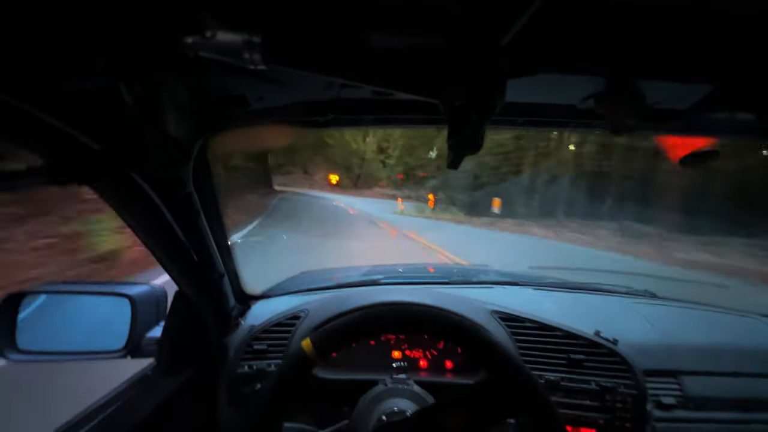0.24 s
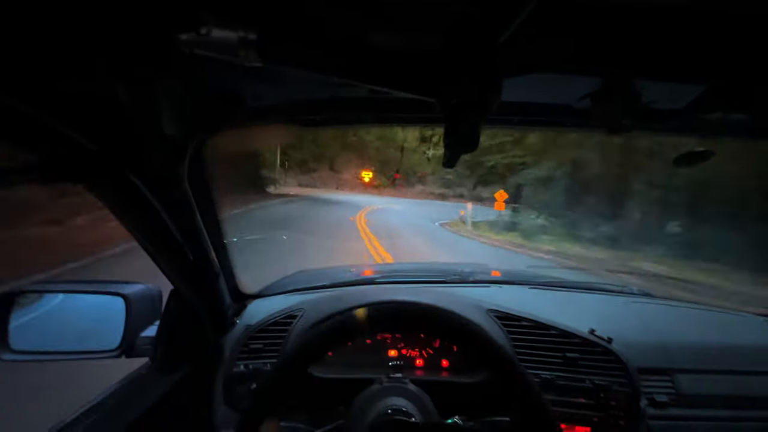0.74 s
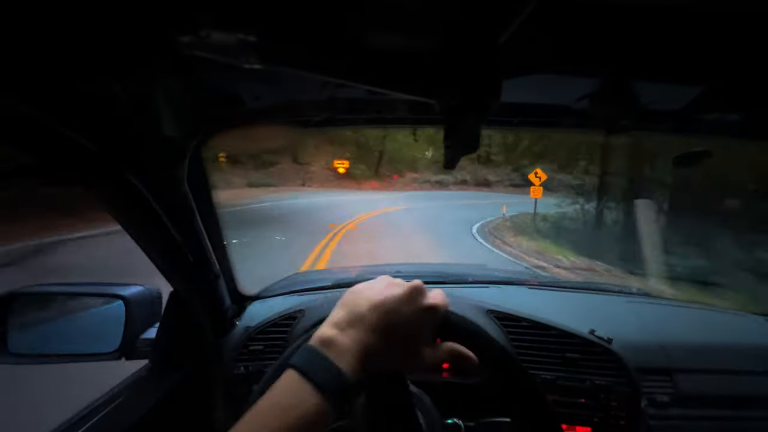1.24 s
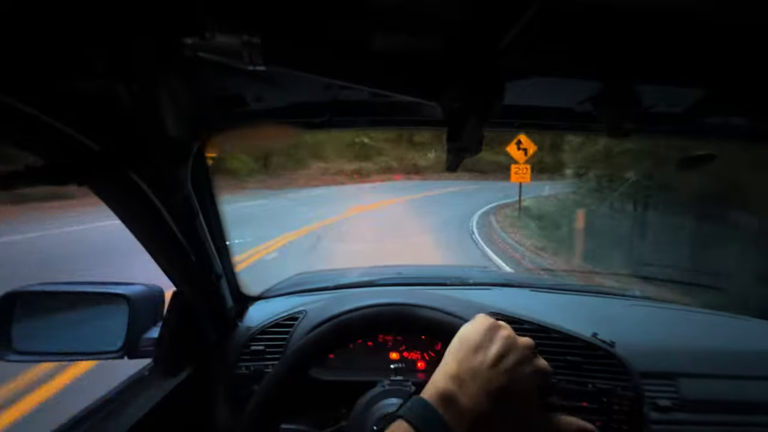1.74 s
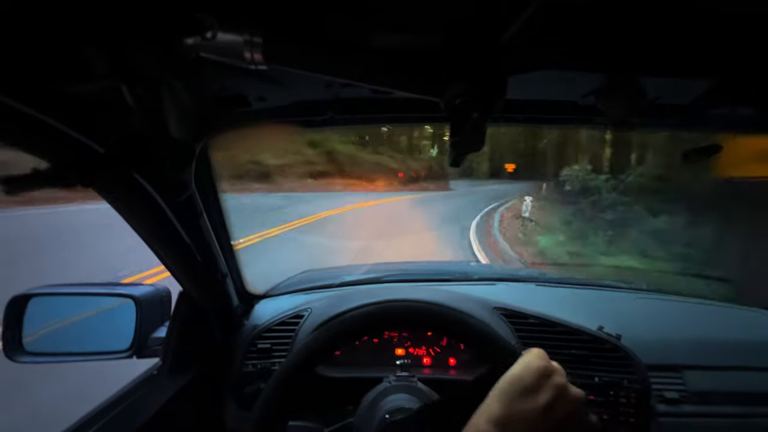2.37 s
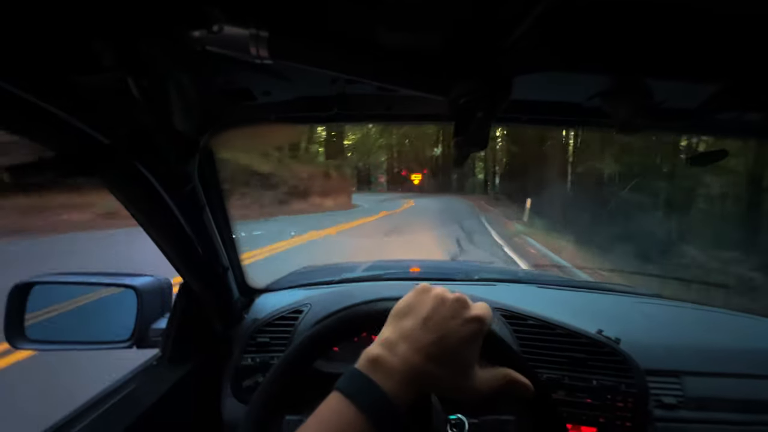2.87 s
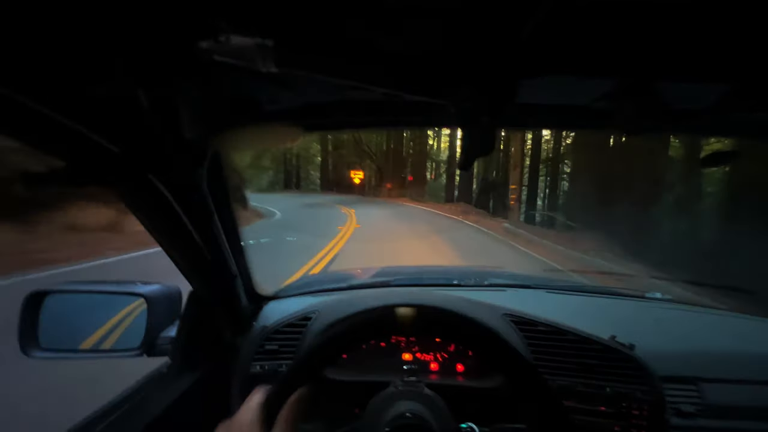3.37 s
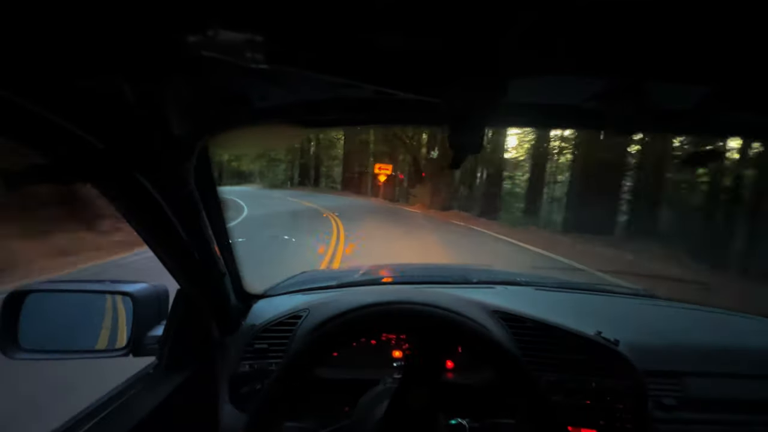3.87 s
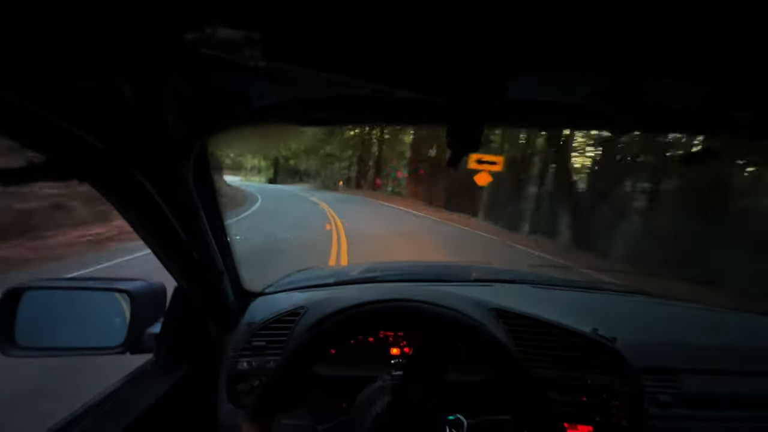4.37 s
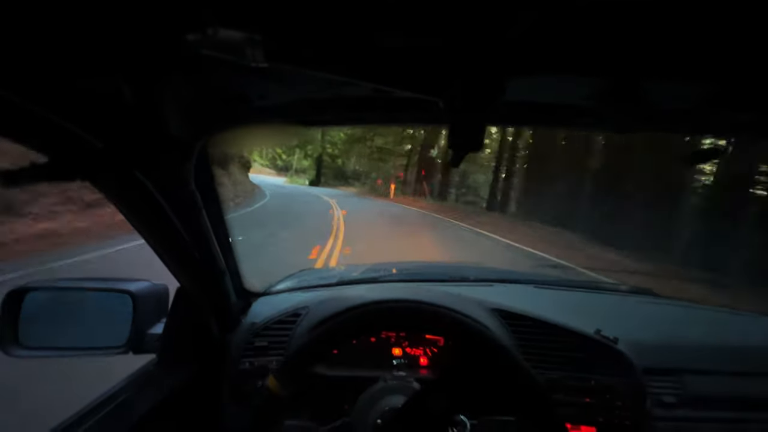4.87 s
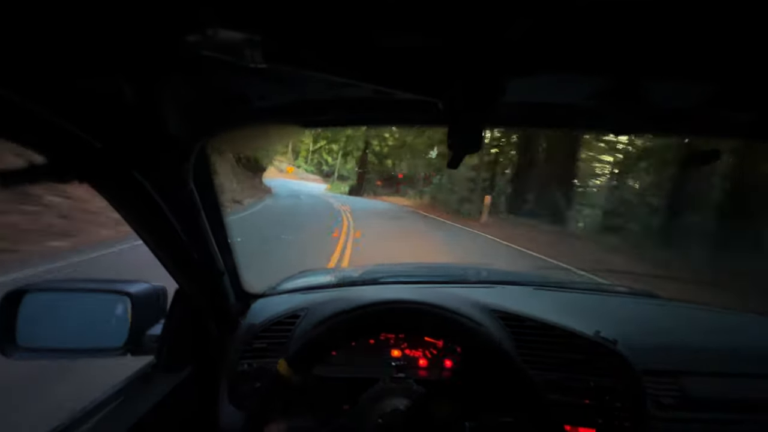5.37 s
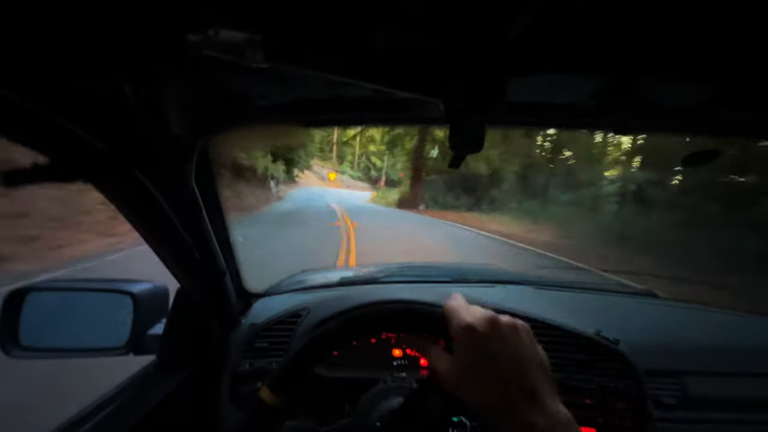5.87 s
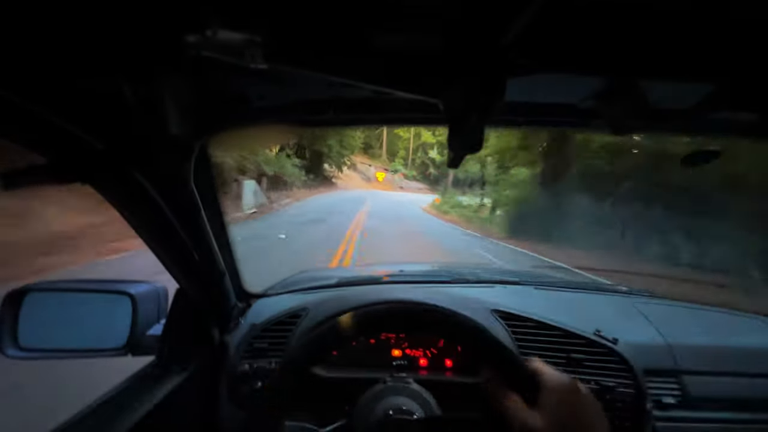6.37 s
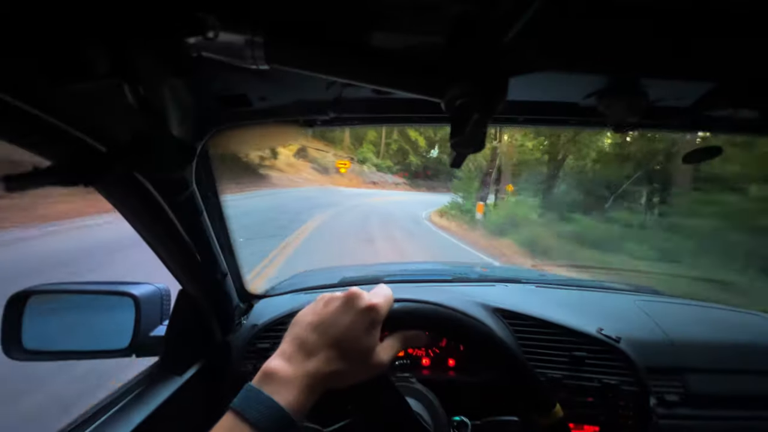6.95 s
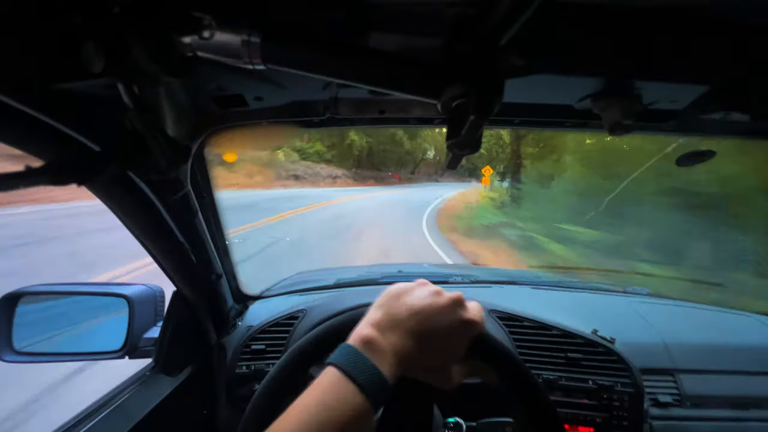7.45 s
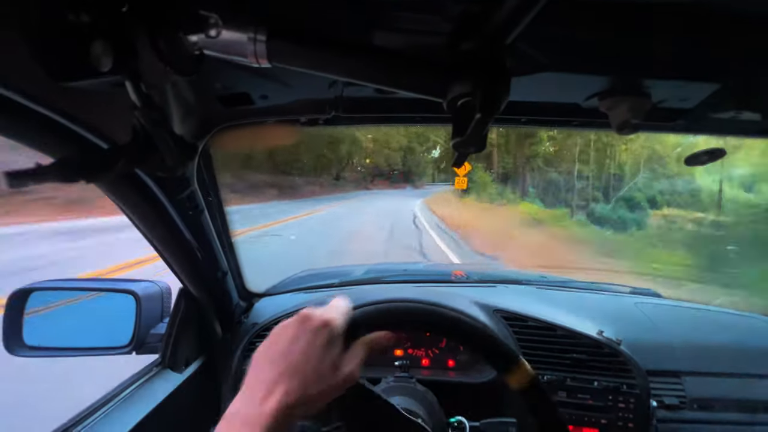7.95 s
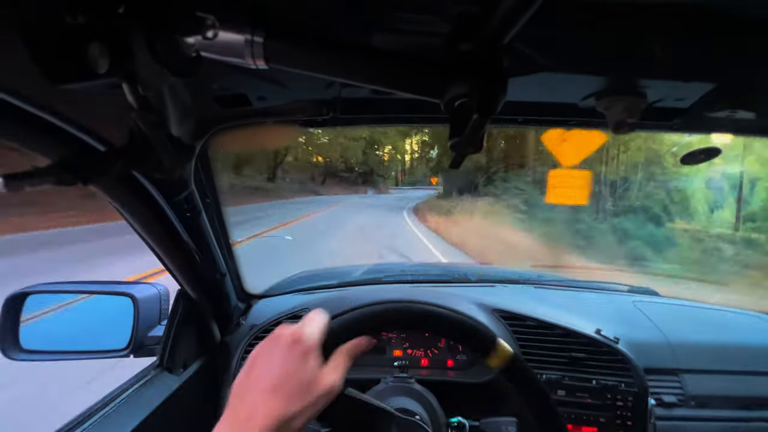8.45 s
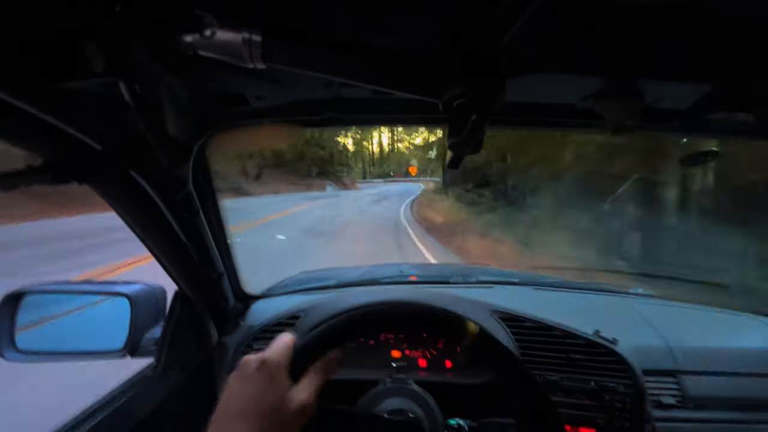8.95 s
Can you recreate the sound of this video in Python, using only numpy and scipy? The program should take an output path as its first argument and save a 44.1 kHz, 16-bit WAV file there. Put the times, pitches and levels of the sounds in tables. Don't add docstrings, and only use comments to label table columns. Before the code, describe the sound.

Close inside a car cabin, a deep six-cylinder engine booms, eases, then pulls harder with a raspy, whining edge. A hard bump thuds and rattles the trim. The revs climb, drop sharply on a lift, then build again through a bend with grainy tyre scrub and a cluster of heavy knocks. Tyre rumble, body roar and soft wind hiss continue throughout, heard in stereo at the driver's head.

```python
import sys
import numpy as np
from scipy import signal
from scipy.fft import rfft, irfft, next_fast_len
from scipy.io import wavfile
from scipy.ndimage import uniform_filter1d, map_coordinates

SR = 44100
rng = np.random.default_rng(int(sys.argv[2]) if len(sys.argv) > 2 else 0)


def elevation(decibels):
    levels = np.asarray(decibels, float)
    return 10 ** (levels / 20)


def dump(signal):
    limited = np.clip(np.atleast_2d(signal).T, -1, 1)
    pcm = np.round(limited * 32767).astype(np.int16)
    wavfile.write(sys.argv[1], SR, pcm)


N = 405719

# (time [s], camshaft speed [Hz])
CAM_SPEED = [(0, 47.6), (.33, 48.46), (.7, 44.37), (1.5, 41.8), (1.9, 45.24), (3.1, 50.28), (3.23, 47.74),
             (3.8, 47.66), (3.94, 49.76), (4.1, 49.9), (5.2, 56.29), (5.39, 53.2), (5.58, 42.91),
             (5.73, 38.2), (7.1, 42.34), (8.48, 45.24), (8.56, 43.8), (9.2, 42.2)]
# (time [s], throttle [0-1])
THROTTLE = [(0.0, 0.37), (0.68, 0.38), (1.56, 0.16), (2.02, 0.9), (3.11, 0.86), (3.17, 0.43), (3.82, 0.56),
            (4.25, 0.91), (4.9, 0.89), (5.38, 0.09), (5.46, 0.96), (5.83, 0.5), (6.53, 0.77), (6.79, 0.66),
            (7.17, 1.0), (8.49, 0.73), (8.53, 0.19), (9.2, 0.37)]
LOW_ORDERS = [2, 3, 4, 5, 6, 7, 8, 9, 10]
LOW_DB = [-18.8, -21.5, -26.5, -21, -10, -22.5, -39, -32, -48]
LOW_LIFT_DB = [4, 7, 0.97, 27, 22.1, 17, 35, 12.7, 17.2]
LOW_TILT_DB_PER_HZ = [0.36, 0.76, 0.5, -0.17, 0.4, -0.48, 0.74, -1.25, 3.5]
# (centre [Hz], width [Hz], level [dB])
CABIN_MODES = [(102.5, 1.5, -10.5), (152.8, 4.3, 0.5), (167.4, 21.8, 0.5), (186.6, 14, -8.5), (230, 33, -4),
               (256.8, 4.1, -11.5), (281.1, 14.6, -4.5), (314, 11, -9), (355.3, 16.5, -4), (413, 13, -8.5),
               (452, 17, -2.5), (501.9, 106.4, -32)]
UPPER_ORDERS = [14, 15, 16, 18, 20, 22, 26, 28, 36]
UPPER_DB = [-47.5, -41.5, -58, -43, -43, -45, -46.5, -46.5, -47.5]
# (centre [Hz], width [Hz], level [dB])
BULKHEAD_MODES = [(602, 230, 3), (1302, 410, 1.5), (1634, 220, 1), (1900, 100, 1)]
MESH_ORDERS = [12, 12, 24, 24, 30, 33.3, 42, 45, 54.3, 58.1, 100, 100, 133.3, 174.3]
# (centre [Hz], width [Hz], level at full throttle [dB], loss with throttle shut [dB])
CASING_MODES = [(466, 12, -29, 16), (575, 64, -38.5, 20.5), (1207, 110, -36.5, 21), (954, 67, -37, 20),
                (1425, 30, -40, 14), (1640, 460, -47, 13), (1885, 13, -40.5, 19), (2194, 70, -47.5, 16),
                (2850, 280, -55.5, 8.5), (2830, 120, -53, 7), (4580, 80, -55, 22), (5017, 220, -62, 24),
                (6420, 200, -62, 20), (7000, 89, -59, 21)]
# (start [s], end [s], level [dB])
BELT_CHIRPS = [(1.75, 1.95, -64), (2.25, 2.75, -57.5), (2.8, 3.15, -61.5), (3.32, 3.335, -48),
               (4.03, 4.13, -53), (4.55, 4.75, -64), (4.9, 5.05, -61.5), (5.75, 6.0, -63), (6.02, 6.2, -56),
               (7.9, 8.4, -59)]
# (frequency [Hz], left lead [rad])
EAR_LEAD = [(100, .1), (170, 0.28), (220, 1.1), (260, 0.25), (300, 0.76), (400, 0.39), (690, 2.3),
            (2000, 1.43), (5000, 1.5)]
# (time [s], tyre and wind load [dB], surface coarseness [dB])
ROAD_LOAD = [(0.0, -36.5, -32.5), (1.07, -39.5, -34), (1.77, -37, -29), (2.08, -36, -32.5),
             (2.54, -33.5, -27.5), (3.02, -34.5, -29.5), (3.36, -37.5, -34.5), (3.92, -36, -29),
             (4.13, -34.5, -30), (4.71, -34, -32.5), (5.07, -32, -26), (5.48, -34.5, -27.5),
             (5.74, -38.5, -28), (6.51, -37, -28.5), (7.25, -34, -26), (7.66, -34.5, -27.5),
             (8.17, -36, -27.5), (9.2, -37, -30.5)]
# (frequency [Hz], density [dB per Hz])
RUMBLE_SPECTRUM = [(15, -38), (27, -12), (45, 7), (75, 4.5), (120, -1.5), (160, 1), (220, -2), (300, -2.5),
                   (380, -23.5), (500, -51), (900, -120)]
# (frequency [Hz], density [dB per Hz])
ROAR_SPECTRUM = [(190, -21.5), (330, 1), (392, -6), (428, -3.5), (526, -5), (609, -5), (810, -5.5),
                 (1240, -12.5), (1700, -10.5), (2600, -27.5), (3380, -53.5), (5720, -120)]
# (frequency [Hz], density [dB per Hz])
HISS_SPECTRUM = [(700, -62.5), (1200, -19), (2000, -1.5), (2550, -4.5), (2900, -4), (3300, -7.5),
                 (4200, -11.5), (5700, -14.5), (7100, -16), (8500, -15.5), (10000, -20), (11500, -25.5),
                 (13500, -29.5), (15600, -38)]
# (frequency [Hz], density [dB per Hz])
TRIM_SPECTRUM = [(1500, -16), (2500, 2.5), (4000, -2.5), (6500, -5.5), (8600, -3), (10500, -8.5),
                 (14000, -37), (16000, -19)]
# (frequency [Hz], left-right correlation [-1 to 1])
ALIKE = [(25, 1), (60, 0.86), (140, 0.72), (300, 0.6), (460, -0.2), (650, -0.59), (1450, 0.053),
         (1950, -0.46), (2700, 0.038), (9500, 0.068), (10900, -0.66), (11700, -0.51), (12300, 0.9),
         (12700, 0.75), (14300, 0.84), (14800, .1)]
# (time [s], peak [dB], ring [Hz])
THUMPS = [(.06, -12.5, 71.7), (1.3, -19.5, 104.7), (3.17, -30, 103), (3.935, -7, 291), (3.947, -6.5, 331),
          (3.961, -3.5, 226), (4.036, -18, 367.6), (4.038, -25.5, 3000), (3.928, -19, 1040),
          (6.919, -19, 1348), (7.033, -20, 1610), (7.277, -20.5, 1385), (5.873, -27, 923),
          (7.456, -23, 1291), (4.229, -11, 143.4), (5.501, -14.5, 98), (5.544, -20, 79.32),
          (8.999, -21, 45), (8.55, -14.5, 42), (6.928, -6, 289), (6.945, -1.5, 193.5), (6.993, -10, 162.5),
          (7.006, -4, 199.7), (7.037, -4.5, 245), (7.051, -3.5, 175), (7.078, -11.5, 312)]
# (frequency [Hz], t60 [s])
RING_T60 = [(70, 0.27), (120, 0.46), (200, 0.02), (320, 0.11), (1000, 0.044), (3000, 0.016)]
# (time [s], rattle peak [dB], knock relative to rattle [dB])
JOLTS = [(0.472, -35, 6), (1.3267, -31.5, 3.5), (1.371, -33, 3), (1.669, -36, -0.5), (2.499, -34.5, -0.5),
         (3.8493, -32.5, 0.5), (3.933, -23.5, 9.5), (3.958, -35.5, 12.5), (3.995, -30, 0.5),
         (4.036, -30, 9), (4.211, -29, 5), (4.2894, -33.5, 9), (4.873, -32, 0), (5.491, -31, -5),
         (6.578, -32, -1.5), (6.754, -26, -0.5), (6.9215, -19.5, 8.5), (6.975, -29, 7), (7.002, -22.5, 0),
         (7.032, -24, 10.5), (7.1607, -32, -12), (7.28, -33, -1), (7.4966, -19.5, -4), (7.584, -30.5, 0),
         (7.838, -29, 4.5), (7.8994, -33.5, 5.5), (8.444, -30, -0.5), (8.893, -33.5, 3),
         (9.101, -30.5, -2.5), (9.1914, -23.5, -10.5)]
# (centre [Hz], width [Hz], level [dB])
DASH_MODES = [(581, 54, 8), (878, 34, 4.5), (1040, 90, 2.5), (1300, 110, -0.5), (1620, 140, 0.5),
              (2030, 250, -7.5), (3000, 290, -18)]
# (time [s], peak [dB])
GRIT = [
    (3.5339, -47.5),
    (7.5018, -32.5),
    (8.4424, -41),
    (9.0239, -39.5),
]
# (start [s], end [s], level [dB])
SCRUB_SPELLS = [
    (2.1, 2.8, -41),
    (7.15, 8.05, -34),
    (8.1, 8.7, -41.5),
]
# (frequency [Hz], left minus right [dB])
LEAN = [(60, -0.5), (140, 0.), (280, 2.5), (650, 2.5), (2000, 1.5), (3500, 4.5), (5500, 12), (8400, 7.5),
        (11200, -0.5), (15000, 2.5)]
# (centre [Hz], half width [Hz], level [dB])
SEAMS = [(5370, 110, -6), (7610, 310, -9.5)]


def unit(x):
    return x / np.sqrt(np.mean(x ** 2) + 1e-20)


def along(points, hz):
    f, v = np.transpose(points)
    return np.interp(np.log(hz + 1), np.log(f + 1), v)


def curves(rows):
    s, *cols = np.transpose(rows)
    return [np.interp(np.arange(N) / SR, s, c) for c in cols]


def wobble(rate_hz):
    knots = rng.standard_normal(int(N * rate_hz / SR) + 4)
    return map_coordinates(knots, [np.arange(N) * rate_hz / SR], order=1)


def filtered(x, response):
    m = next_fast_len(N + 8192)
    return irfft(rfft(x, m) * response(np.fft.rfftfreq(m, 1 / SR)), m)[..., :N]


def resonances(modes):
    def response(f):
        total = 0
        for k, (c, w, db) in enumerate(modes):
            total = total + (-1) ** k * elevation(db) * 1j * f * w / (c * c - f * f + 1j * f * w)
        return total
    return response


def spells(rows):
    t = np.arange(N) / SR
    return sum(elevation(db) * np.interp(t, [a - .04, a + 0.037, b - .03, b + 0.055], [0, 1, 1, 0])
               for a, b, db in rows)


def bursts(times_s, peaks_db, t60_s, rise_s):
    out, t = np.zeros(N + SR), np.arange(SR // 2) / SR
    for s, db in zip(times_s, peaks_db):
        out[round(s * SR):][:len(t)] += elevation(db - 60 * t / t60_s) * (1 - np.exp(-t / rise_s))
    return out[:N]


def rush(spectrum, patchy_db, streaky_db=0):
    z = signal.stft(rng.standard_normal((2, N)), nperseg=512)[2]

    def blur(bins, frames):
        spread = uniform_filter1d(rng.standard_normal(z.shape[1:]), bins, axis=0)
        return unit(uniform_filter1d(spread, frames, axis=1))

    patches = blur(8, 10)
    streaks = blur(1, 60)
    pair = signal.istft(z * elevation(patchy_db * patches + streaky_db * streaks), nperseg=512)[1][:, :N]

    def mid_side(hz):
        turn = np.arccos(np.clip(along(ALIKE, hz), -1, 1)) / 2
        return elevation(along(spectrum, hz)) * [np.cos(turn), np.sin(turn)]

    mid, side = filtered(pair, mid_side)
    return unit(np.array([mid + side, mid - side]))


def shaft_order(k, angle, db, shake_rad):
    phase = k * angle + shake_rad * wobble(25) + rng.uniform(0, 2 * np.pi)
    return np.sqrt(2) * elevation(db) * np.sin(phase)


def cabin_gain(hz):
    null_hz, null_width_hz, null_db = 335, 11.3, -7.5
    f = np.arange(0, 700, .5)
    power = sum(elevation(2 * db) / (1 + (2 * (f - c) / w) ** 2) for c, w, db in CABIN_MODES)
    null = elevation(null_db * np.exp(-((f - null_hz) / null_width_hz) ** 2))
    return np.interp(hz, f, np.sqrt(power) * null)


def boom(cam_hz, angle, shut, lurch_db):
    mid_hz = 46
    out = 0
    for k, db, lift_db, tilt in zip(LOW_ORDERS, LOW_DB, LOW_LIFT_DB, LOW_TILT_DB_PER_HZ):
        steady_db = db - lift_db * shut + tilt * (cam_hz - mid_hz)
        flutter_db = (1.66 + lurch_db) * wobble(22) + 1.5 * wobble(4)
        tone = shaft_order(k, angle, steady_db + flutter_db, 0.19 + .3 * lurch_db)
        out = out + cabin_gain(k * cam_hz) * tone
    return out


def rasp(angle, shut):
    lift_db, flicker_db = 17, 3.5
    orders = sum(shaft_order(k, angle, db - lift_db * shut + flicker_db * wobble(6), .5)
                 for k, db in zip(UPPER_ORDERS, UPPER_DB))
    return filtered(orders, resonances(BULKHEAD_MODES))


def whine(cam_hz, angle, shut):
    belt_order, smear_rad, flicker_db = 116.2, 2.2, 3.5
    out = 0
    for k, (c, w, db, lift_db) in zip(MESH_ORDERS, CASING_MODES):
        unsteady = min(1, .25 + k / 90)
        level_db = db - lift_db * shut + unsteady * flicker_db * wobble(16)
        tone = shaft_order(k, angle, level_db, smear_rad * unsteady ** 2)
        out = out + np.exp(-((k * cam_hz - c) / w) ** 2) * tone
    belt = shaft_order(belt_order, angle, flicker_db * wobble(15), smear_rad)
    return out + spells(BELT_CHIRPS) * belt


def engine(cam_hz, angle, throttle):
    lurch_db_per_hz_s = 0.03
    disengaged = 6
    shut = 1 - throttle
    slowing_hz_s = np.clip(-np.gradient(cam_hz) * SR, 0, None)
    lurch_db = lurch_db_per_hz_s * uniform_filter1d(slowing_hz_s, size=2000)
    driven = elevation(-disengaged * lurch_db) * (whine(cam_hz, angle, shut) + rasp(angle, shut))

    def ears(hz):
        return np.exp(.5j * along(EAR_LEAD, hz) * [[1], [-1]])

    return filtered(boom(cam_hz, angle, shut, lurch_db) + driven, ears)


def road(angle, throttle):
    hiss_under_db, hiss_grows, hiss_drift_db_per_s = 12, 0.93, 0.11
    buzz_mean_db, buzz_grows, buzz_fitful_db = -60.5, 1.2, 3.5
    roar_db, rumble_db = curves(ROAD_LOAD)
    mean_db = roar_db.mean()
    hiss_db = mean_db - hiss_under_db + hiss_grows * (roar_db - mean_db)
    hiss_db = hiss_db + hiss_drift_db_per_s * np.arange(N) / SR
    texture = wobble(9)
    chop = 1 + 0.11 * throttle * np.sin(angle)

    rumble_gain = elevation(rumble_db + 4.0 + 1.1 * wobble(14) + 0.85 * wobble(7))
    rumble = rumble_gain * rush(RUMBLE_SPECTRUM, patchy_db=-1.0)
    roar_gain = elevation(roar_db + 5.0 + 0.72 * texture) * chop
    roar = roar_gain * rush(ROAR_SPECTRUM, patchy_db=1.28, streaky_db=1.3)
    hiss_gain = elevation(hiss_db + 3.5 + 0.77 * texture + 0.32 * wobble(30))
    hiss = hiss_gain * rush(HISS_SPECTRUM, patchy_db=1.02, streaky_db=-0.1)
    buzz_db = buzz_mean_db + buzz_grows * (rumble_db - rumble_db.mean()) + buzz_fitful_db * wobble(20)
    buzz = elevation(buzz_db) * rush(TRIM_SPECTRUM, patchy_db=1.2)
    return rumble + roar + hiss + buzz


def thumps():
    rise_s = 0.00077
    out, t = np.zeros(N + SR), np.arange(SR // 2) / SR
    for s, db, hz in THUMPS:
        envelope = elevation(db - 60 * t / along(RING_T60, hz)) * (1 - np.exp(-t / rise_s))
        out[round(s * SR):][:len(t)] += envelope * np.sin(2 * np.pi * hz * t)
    return out[:N] * elevation([[1.5], [-1.5]])


def rattles():
    rattle_t60_s, knock_t60_s, knock_lead_s = 0.16, 0.18, .004
    s, db, knock_db = np.transpose(JOLTS)
    trim = bursts(s, db - 8.0, rattle_t60_s, rise_s=0.0032) * rush(TRIM_SPECTRUM, patchy_db=2.2)
    shove = bursts(s - knock_lead_s, db + knock_db + 7.0, knock_t60_s, rise_s=0.0013)
    shove = shove * rush([(300, 1.5), (4000, -1.5)], patchy_db=1.5)
    return trim + filtered(shove, resonances(DASH_MODES))


def scrub():
    spectrum = [(200, -120), (450, -43), (650, 0.5), (900, -6.0), (1300, -38), (2500, -120)]  # (Hz, dB per Hz)
    return spells(SCRUB_SPELLS) * elevation(2.5 * wobble(40)) * rush(spectrum, patchy_db=-0.5)


def grit_ticks():
    s, db = np.transpose(GRIT)
    grit = filtered(rng.standard_normal(N), lambda hz: np.exp(-((hz - 13800) / 2000) ** 2))
    return bursts(s, db + 0.5, .04, rise_s=.0006) * unit(grit)


def scene():
    cam_hz, = curves(CAM_SPEED)
    angle = 2 * np.pi * np.cumsum(cam_hz) / SR
    throttle = np.clip(curves(THROTTLE)[0], 0, 1)
    running = engine(cam_hz, angle, throttle) + road(angle, throttle)
    return running + thumps() + rattles() + scrub() + grit_ticks()


def top_cut(x):
    return signal.sosfilt(signal.butter(12, 15720, fs=SR, output="sos"), x)


def record(dry):
    def microphones(hz):
        seams_db = sum(db * np.exp(-((hz - c) / w) ** 4) for c, w, db in SEAMS)
        return elevation(along(LEAN, hz) / 2 * [[1], [-1]] + seams_db)

    ceiling = .93
    heard = filtered(dry, microphones)
    heard = heard / (1 + np.abs(heard / ceiling) ** 6) ** (1 / 6)
    return top_cut(heard)


dry = scene()
out = record(dry)
dump(out)
```